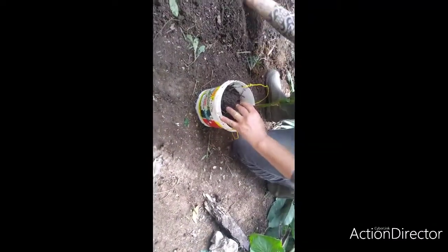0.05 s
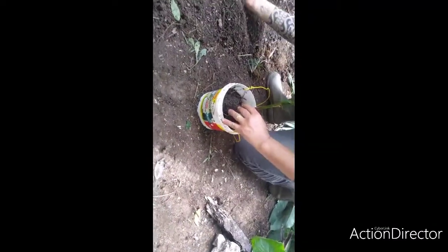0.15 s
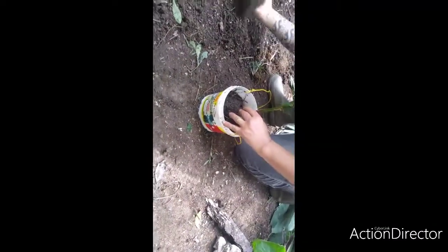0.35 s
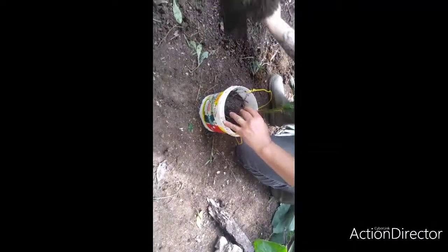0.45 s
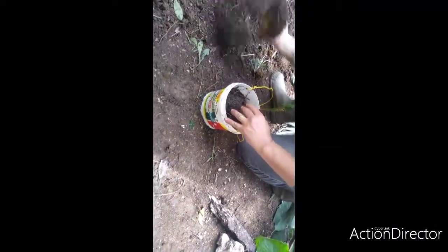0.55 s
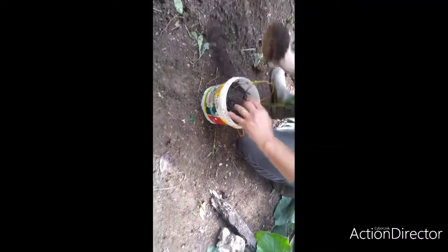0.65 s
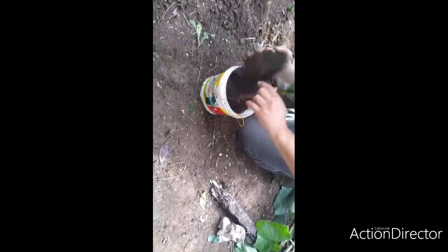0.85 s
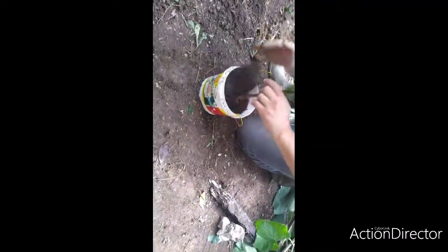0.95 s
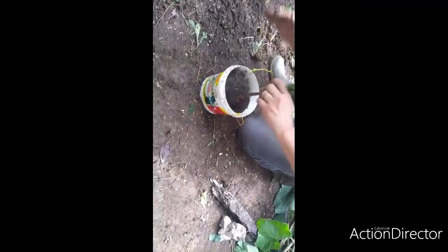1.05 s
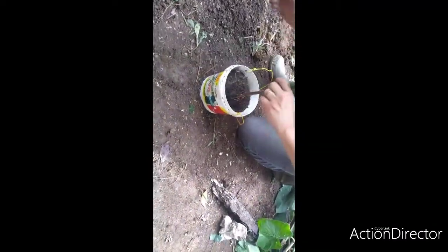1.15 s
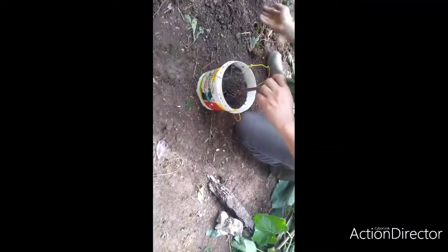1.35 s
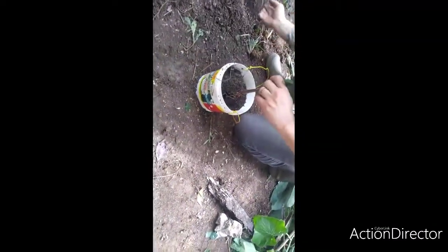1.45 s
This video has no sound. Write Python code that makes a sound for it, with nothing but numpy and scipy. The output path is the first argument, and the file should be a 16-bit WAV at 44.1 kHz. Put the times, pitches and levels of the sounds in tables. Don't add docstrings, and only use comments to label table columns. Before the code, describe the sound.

Three sharp taps of a hand on a spade, then soil tipped into a plastic bucket

```python
import sys
import numpy as np
from scipy import signal
from scipy.fft import rfft, irfft
from scipy.io import wavfile

SR = 44100
rng = np.random.default_rng(int(sys.argv[2]) if len(sys.argv) > 2 else 0)


def unload_wav(signal):
    wavfile.write(
        sys.argv[1],
        SR,
        np.round(np.clip(np.atleast_2d(signal).T, -1, 1) * 32767).astype(np.int16),
    )


def volts(x):
    e = np.asarray(x, float) / 20
    return 10 ** e


N = 66150
T = np.arange(N) / SR

# t/s, level/dB
SLIDE = [(0, -104), (.52, -80.5), (.6, -68.5), (.66, -75), (.74, -76.5), (.78, -62.5), (.815, -70),
         (.83, -79), (.905, -72.5), (.96, -74), (1.0, -65.5), (1.05, -67.5), (1.12, -71.5), (1.15, -71),
         (1.25, -84), (1.44, -79.5), (1.5, -72)]
SOIL_LAG_S = 0.000466


def rms_one(x):
    return x / np.sqrt(np.mean(x ** 2) + 1e-20)


def in_time(rows):
    return np.interp(T, *np.transpose(rows))


def band(x, low_hz, high_hz):
    sos = signal.butter(2, [low_hz, min(high_hz, 0.45 * SR)], "band", fs=SR, output="sos")
    return signal.sosfilt(sos, x)


def drift(rate_hz):
    r = np.exp(-2 * np.pi * rate_hz / SR)
    wander = signal.lfilter([1], [1, -2 * r, r * r], rng.standard_normal(N + 9000))
    return rms_one(wander[9000:])


def ring(x, hz, t60_s):
    r = volts(-60 / (t60_s * SR))
    w = 2 * np.pi * hz / SR
    return signal.lfilter([0, np.sin(w)], [1, -2 * r * np.cos(w), r * r], x + 1e-18)


def later(x, delay_s):
    f = np.arange(N // 2 + 1) * SR / N
    return irfft(rfft(x) * np.exp(-2j * np.pi * f * delay_s), N)


def ports(from_left, from_right, lag_s):
    f = np.arange(N // 2 + 1) * SR / N
    shade = 1 / np.sqrt(1 + (f / 6500) ** 10)
    far_left = later(irfft(rfft(from_left) * shade, N), lag_s)
    far_right = later(irfft(rfft(from_right) * shade, N), lag_s)
    return np.array([-from_left - far_right, far_left + from_right])


def grains(rate_per_s):
    spread_db = 5.5
    size = volts(spread_db * np.minimum(rng.exponential(1, N), 4)) * rng.choice([-1, 1], N)
    return rms_one(size * (rng.random(N) < rate_per_s / SR))


def traffic():
    # f/Hz, level/dB per Hz
    colour_points = [(150, 3), (400, -1.5), (900, -5), (1600, -12), (3000, -22.5), (6000, -28),
                     (10000, -32), (15000, -39.5)]
    level_db, diffuse_db, lag_s = -54.5, 2.5, 0.000482
    hz, db = np.transpose(colour_points)
    f = np.maximum(np.arange(N // 2 + 1) * SR / N, 1)
    low_cut = f ** 2 / (f ** 2 + 110 ** 2)
    colour = volts(np.interp(np.log(f), np.log(hz), db)) * low_cut
    noise = rng.standard_normal((4, N))
    left, right, own_left, own_right = rms_one(irfft(rfft(noise) * colour, N))
    diffuse = volts(diffuse_db) * band(np.array([own_left, own_right]), 5700, 12000)
    return volts(level_db + 0.8 * drift(8)) * (ports(left, right, lag_s) + diffuse)


def rumble():
    low = band(band(rng.standard_normal(N), 55, 140 * 1.364), 32, 690)
    lumps_db = 2 * drift(4.1)
    return rms_one(low) * volts(lumps_db)


def breeze():
    # t/s, level/dB
    gusts = [(0, -48), (.15, -49), (.3, -49), (.4, -48.5), (.5, -46.5), (.6, -48.5), (.72, -57.5),
             (.8, -45.5), (.95, -51.5), (1.1, -47.5), (1.3, -49.5), (1.5, -42.5)]
    drone_hz, drone_db = 95, -6
    alike = 0.13
    common, own_left, own_right = rumble(), rumble(), rumble()
    common = common + volts(drone_db) * rms_one(ring(rng.standard_normal(N), drone_hz, 0.3))
    shared = np.sqrt(alike) * common * [[-1], [1]]
    own = np.sqrt(1 - alike) * np.array([own_left, own_right])
    return volts(in_time(gusts)) * (shared + own)


def insect():
    whine = rms_one(ring(rng.standard_normal(N), 11400, 0.05))
    return volts(-83) * whine * [[1], [0.3]]


def ticks():
    # t/s, peak/dB, pitch f/Hz, ring/s
    pieces = [
        (.2335, -42.5, 3200, 0.0038),
        (.814, -41, 8200, 0.00071),
        (.908, -48, 4670, 0.0077),
        (1.052, -40, 8600, 0.00069),
        (1.08, -50.5, 6270, 0.027),
        (1.117, -47.5, 5400, 0.0017),
        (1.145, -53, 4930, 0.0018),
        (1.221, -48, 9900, 0.00081),
        (1.472, -52.5, 8750, 0.0018),
        (1.492, -53, 8700, .002),
    ]
    out = np.zeros(N)
    for s, db, hz, t60_s in pieces:
        click = np.zeros(N)
        contacts = int(s * SR) + np.arange(0, 90, 15)
        click[contacts] = volts(db - 4) * rng.standard_normal(6)
        out += ring(click, hz, t60_s)
    return ports(out, 0.3 * out, SOIL_LAG_S)


def taps():
    # t/s, peak/dB, quick share of rebound [0-1], thump/dB, width/s
    blows = [
        (0.2435, -0.46, 0.71, -34.5, 0.0001),
        (0.4582, -6, 0.51, -33, .00013),
        (0.6675, -0.72, 0.6, -34, 0.00011),
    ]
    # level/dB, length/s, top f/Hz
    rattles = [
        (-54.5, 0.0076, 7600),
        (-56.5, 0.015, 6100),
        (-56, 0.017, 4600),
    ]
    point = 1.73
    far_port_db, lag_s, shadow = -2, 0.000473, 0.53
    out, grit = np.zeros(N), grains(8600)
    for (s, db, quick, thump_db, width_s), (grit_db, length_s, top_hz) in zip(blows, rattles):
        pulse = np.exp(-np.abs((T - s) / width_s) ** point)
        rebound = ring(pulse, 800, 0.0017)
        settle = ring(pulse, 203, 0.01)
        give_back = quick * rebound / rebound.sum() + (1 - quick) * settle / settle.sum()
        blow = pulse - pulse.sum() * give_back
        thump = ring(pulse / pulse.sum(), 68, 0.11)
        out -= volts(db) * blow / blow.max() + volts(thump_db) * thump
        fade = np.exp(-((T - s) / length_s) ** 4) * (T > s)
        out += volts(grit_db) * fade * rms_one(band(grit, 1800, top_hz))
    shaded = signal.lfilter([1 - shadow], [1, -shadow], out)
    return np.array([-volts(far_port_db) * later(shaded, lag_s), out])


def sand():
    return rms_one(signal.lfilter([1], [1, -0.45], band(grains(6900), 3020, 12600)))


def slide():
    patches_db = 0.67 * drift(54)
    return volts(in_time(SLIDE) + patches_db) * ports(sand(), sand(), SOIL_LAG_S)


def crumbs():
    left, right = (rms_one(ring(grains(300), 2100, 0.0061)) for _ in range(2))
    after_taps = T > 0.72
    return volts(in_time(SLIDE) + 1) * after_taps * ports(left, right, SOIL_LAG_S)


def clods():
    # t/s, level/dB, length/s, pitch f/Hz
    landings = [(.754, -45, 0.0041, 2100), (0.767, -43.5, 0.01, 1720), (0.78, -54, 0.016, 1880),
                (0.801, -62, 0.0054, 1790), (0.833, -51, .003, 1890), (0.843, -63, 0.013, 1080),
                (0.885, -61, 0.0031, 1990), (.898, -58, 0.0061, 1910), (0.904, -54.5, 0.015, 2310),
                (.921, -51.5, .004, 1700), (.926, -54.5, 0.0058, 1060), (0.941, -56.5, 0.021, 2200),
                (0.971, -61.5, 0.035, 1600), (1, -53, .008, 1800), (1.009, -53, 0.013, 1960),
                (1.032, -48.5, 0.015, 1970), (1.044, -51, 0.0042, 1750), (1.048, -47, 0.0058, 1810),
                (1.064, -53.5, 0.022, 1980), (1.087, -64, 0.02, 2000), (1.112, -59, 0.036, 2180),
                (1.138, -54.5, 0.0064, 2130), (1.16, -54.5, 0.0051, 556), (1.175, -51, 0.01, 2130),
                (1.213, -63.5, 0.0039, 2100)]
    ring_cycles, lead_grain = 6.0, 3.5
    sides = []
    for _ in range(2):
        clicks, out = grains(700), np.zeros(N)
        for s, db, length_s, hz in landings:
            i, j = int(s * SR), int((s + 4 * length_s + 0.012) * SR)
            t = T[i:j] - s
            burst = clicks[i:j] * np.minimum(t / 0.0014, 1) * np.exp(-np.abs(t / length_s) ** 1.6)
            burst[40] += lead_grain
            t60_s = ring_cycles / hz
            body = ring(burst, hz * 0.96, t60_s) - 0.68 * ring(burst, hz * 1.285, t60_s)
            out[i:j] += volts(db + 5) * body / np.abs(body).max()
        sides.append(out)
    return ports(*sides, SOIL_LAG_S)


def scene():
    # t/s, level/dB
    gain = [(0, -1), (.12, -1), (.244, 1), (.25, -11.5), (.27, -14.5), (.33, -9), (.45, -10), (.49, -13),
            (.6, -8.5), (.68, -8.5), (.72, -10), (.78, -17.5), (1.1, -13), (1.5, -11)]
    distant = traffic() + breeze() + insect()
    near = ticks() + taps() + slide() + crumbs() + clods()
    return near + volts(in_time(gain)) * distant


def low_pass(x):
    return signal.sosfilt(signal.butter(12, 15450, fs=SR, output="sos"), x)


def record(dry):
    top_cut = signal.cheby2(14, 26, 14550, fs=SR, output="sos")
    mix = signal.sosfilt(top_cut, dry)
    return low_pass(mix)


dry = scene()
out = record(dry)
unload_wav(out)
```